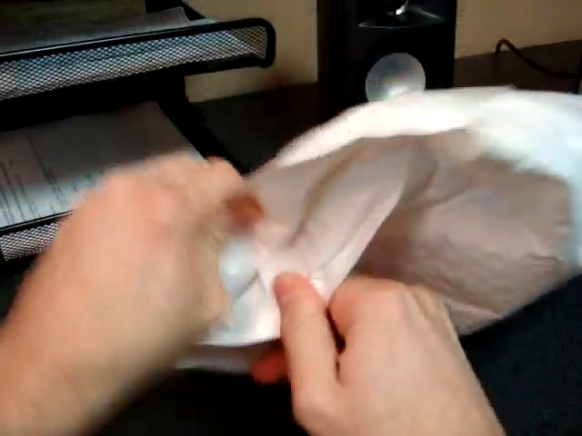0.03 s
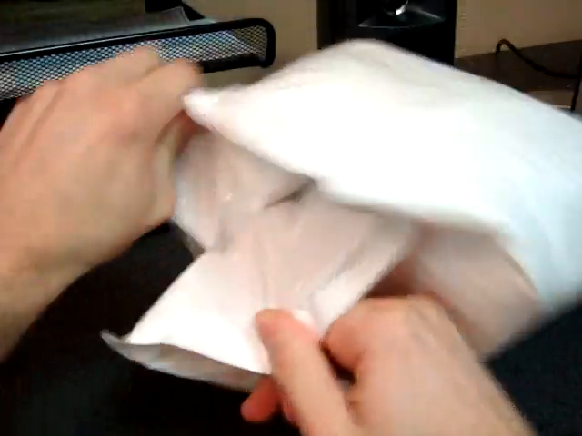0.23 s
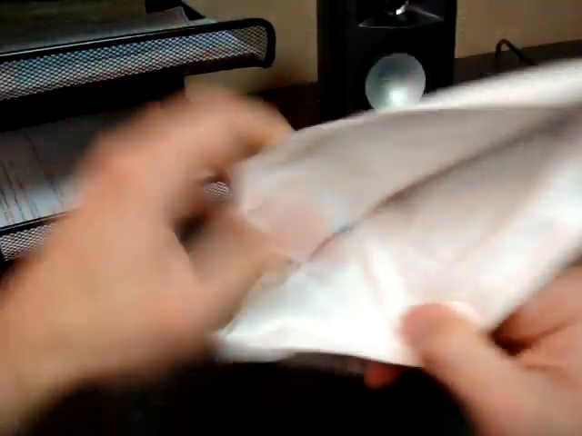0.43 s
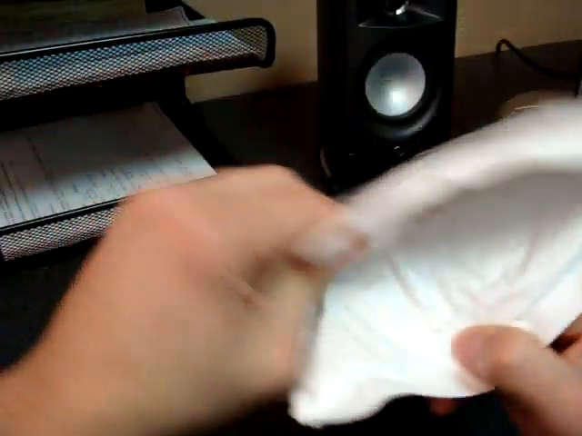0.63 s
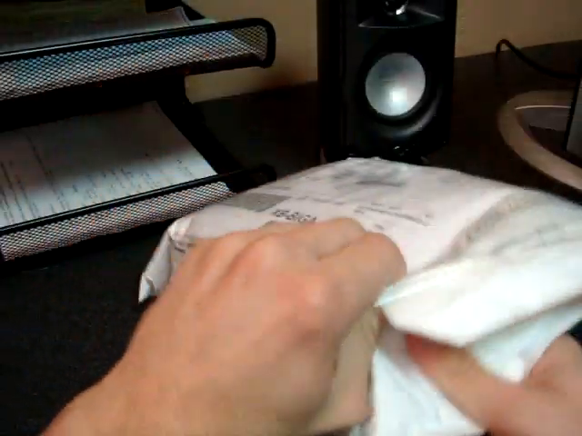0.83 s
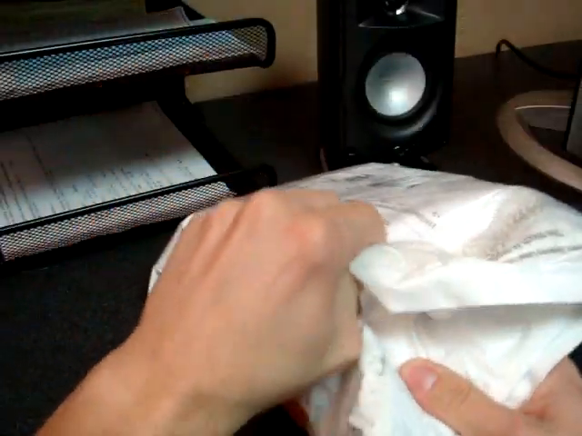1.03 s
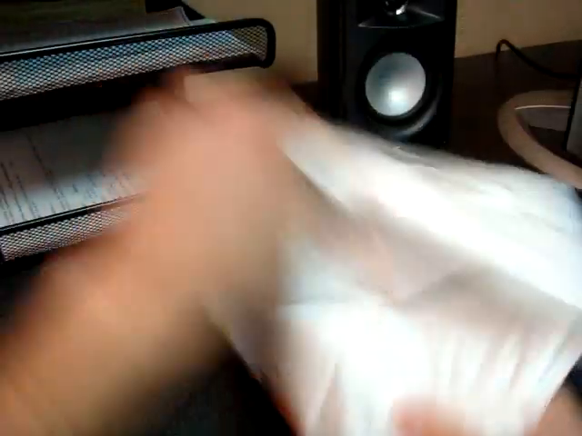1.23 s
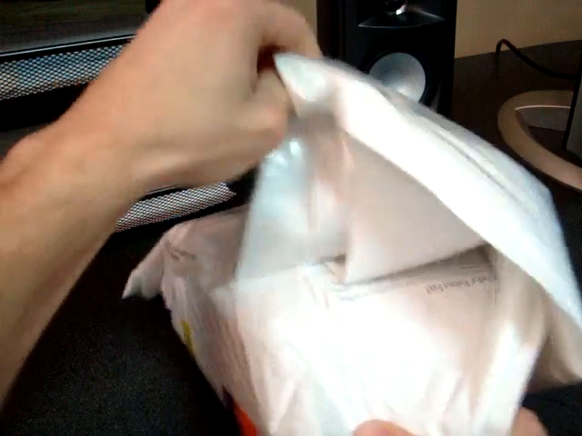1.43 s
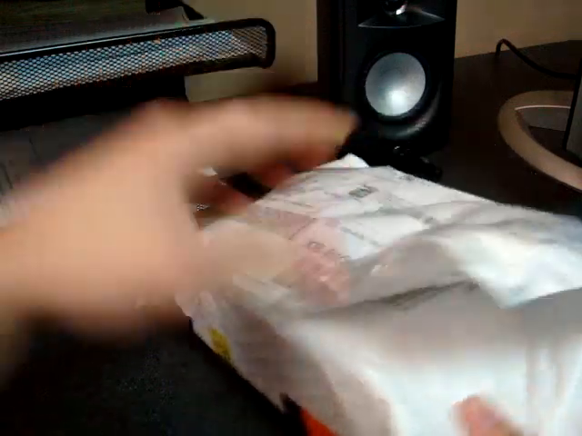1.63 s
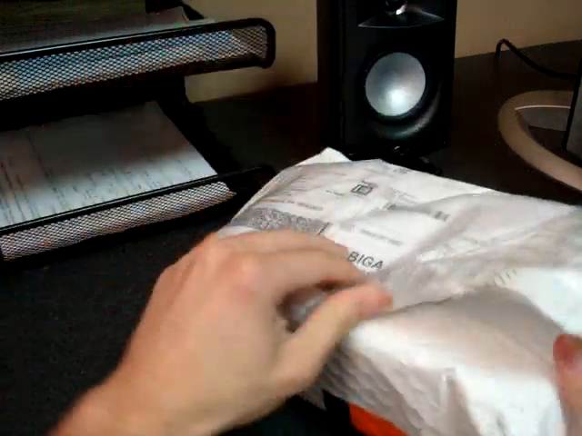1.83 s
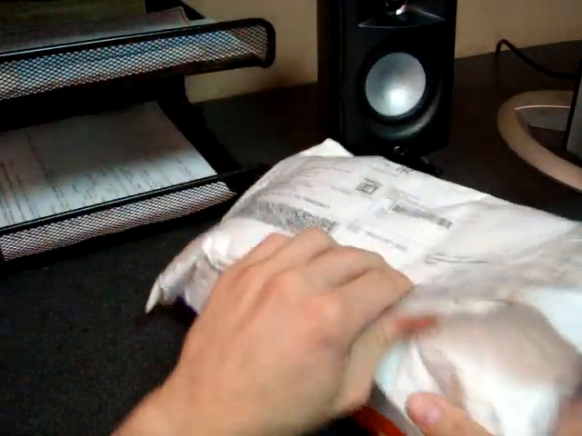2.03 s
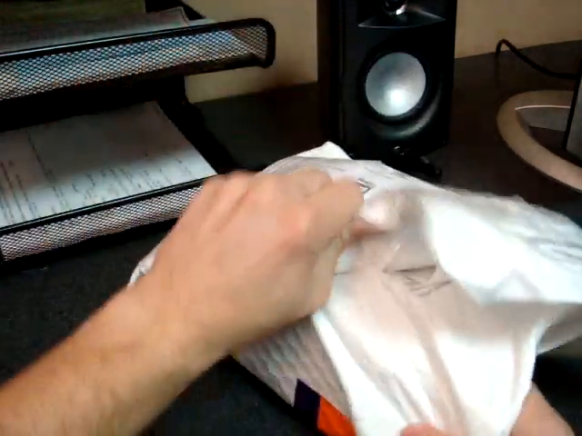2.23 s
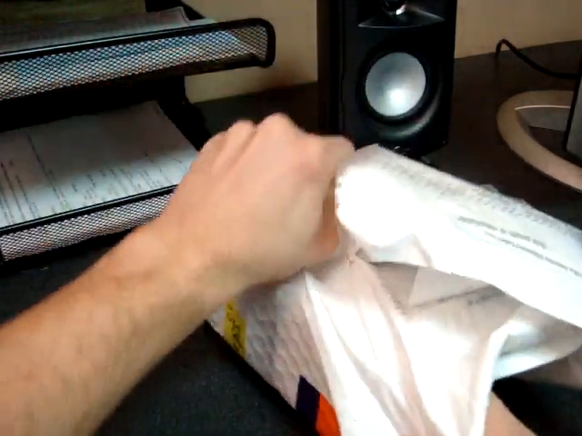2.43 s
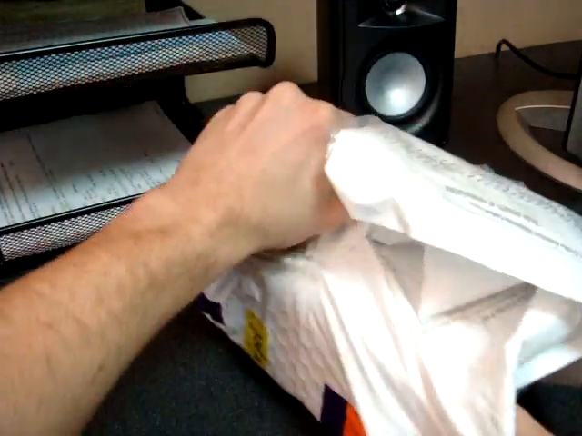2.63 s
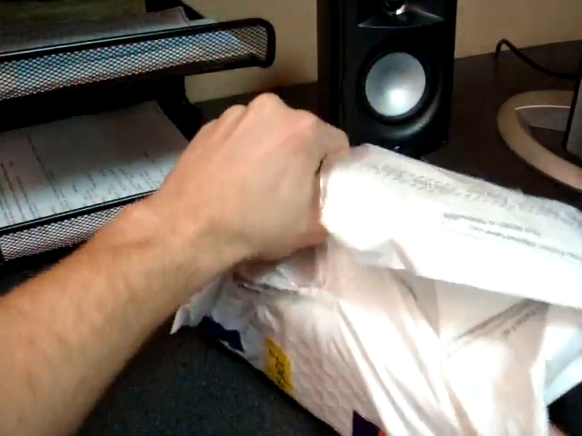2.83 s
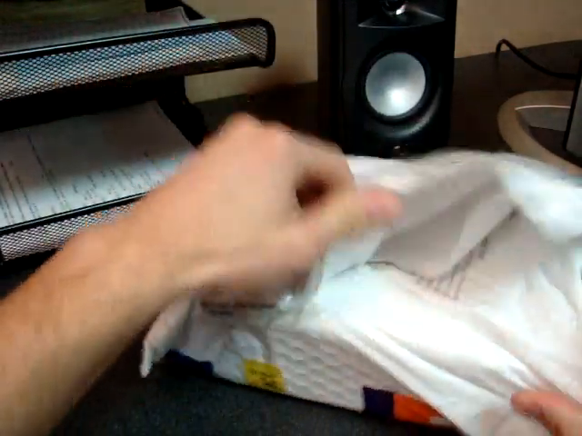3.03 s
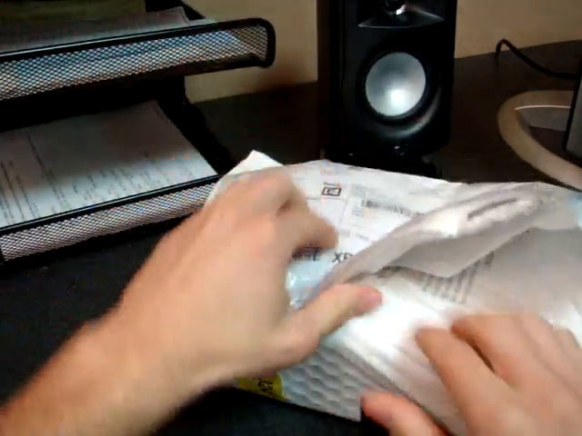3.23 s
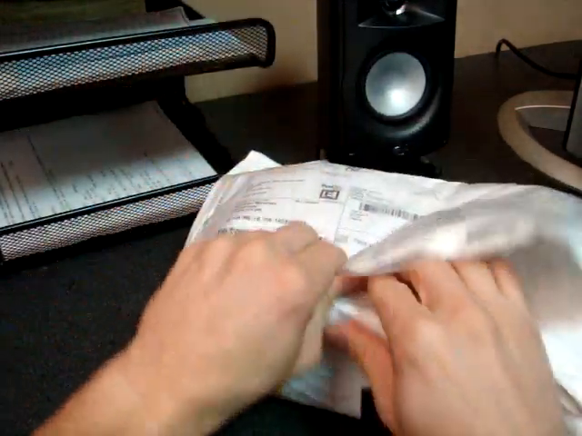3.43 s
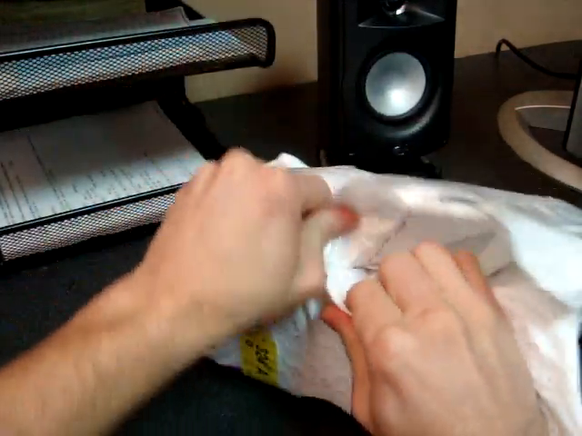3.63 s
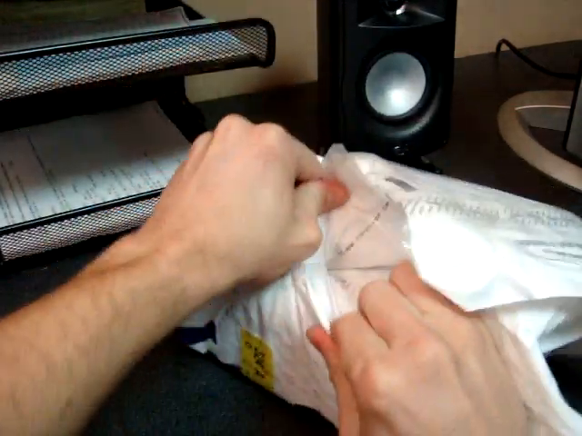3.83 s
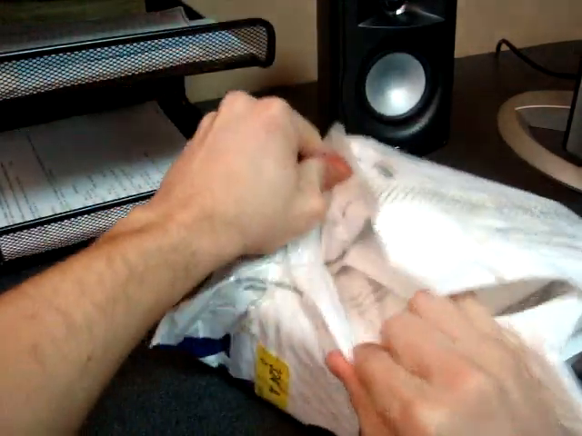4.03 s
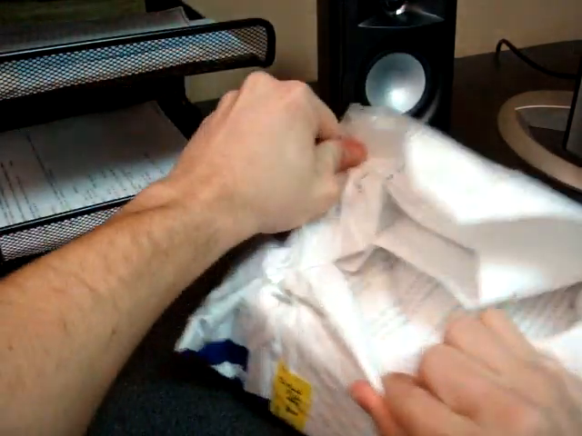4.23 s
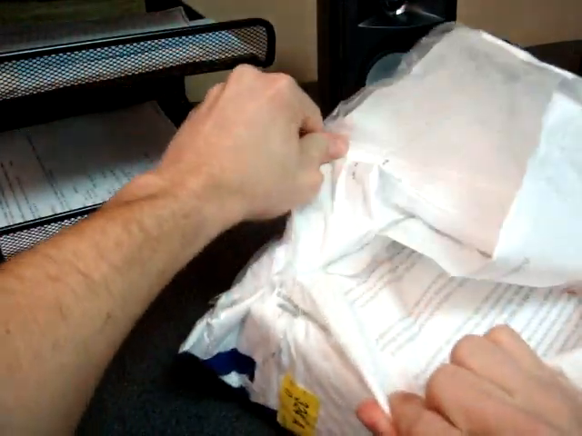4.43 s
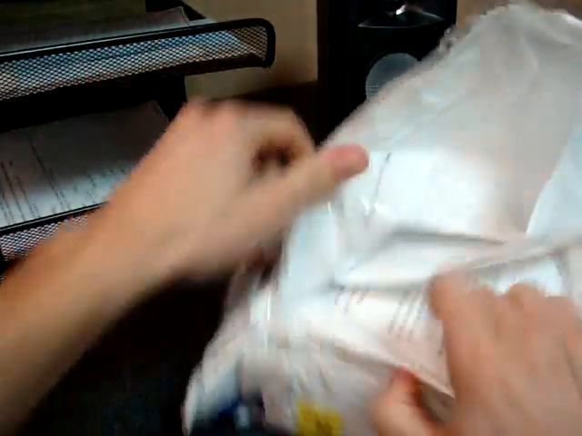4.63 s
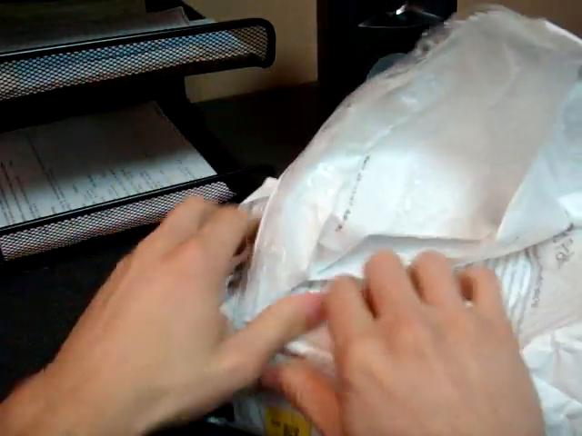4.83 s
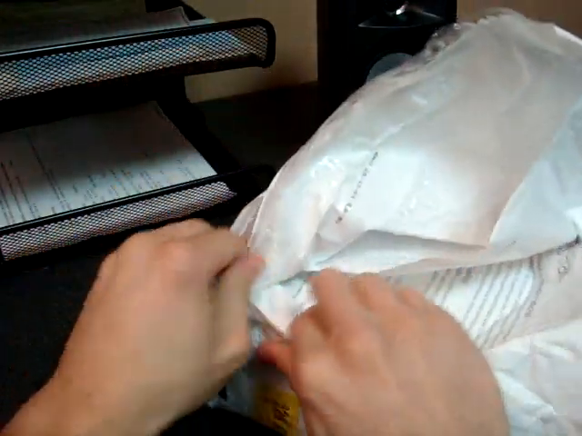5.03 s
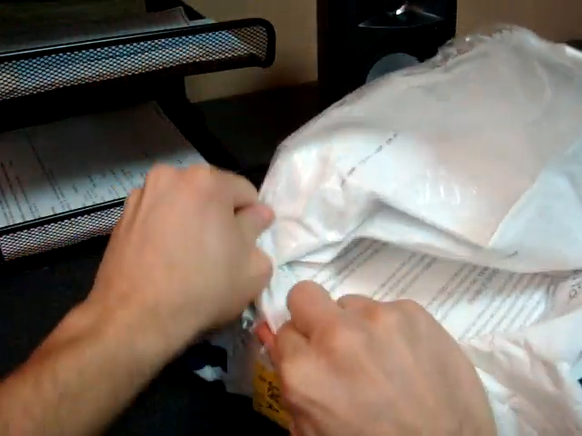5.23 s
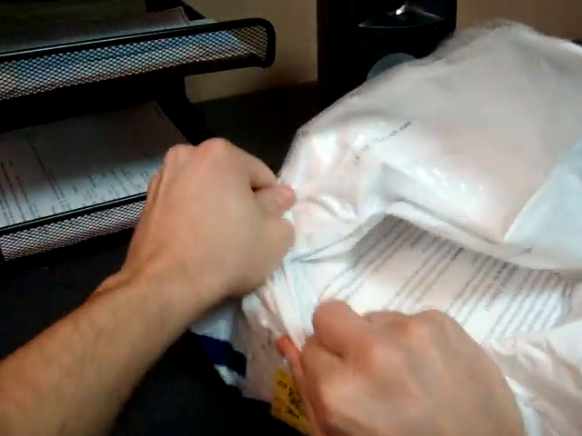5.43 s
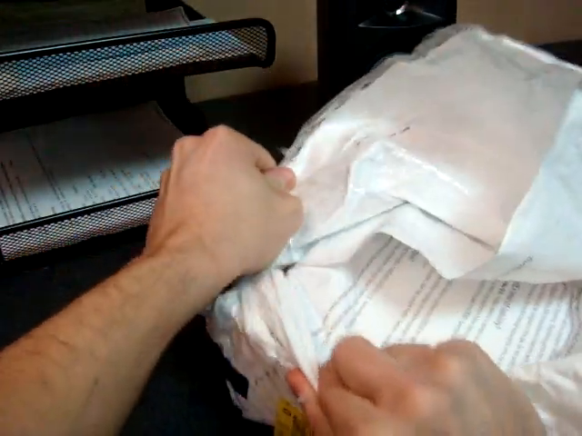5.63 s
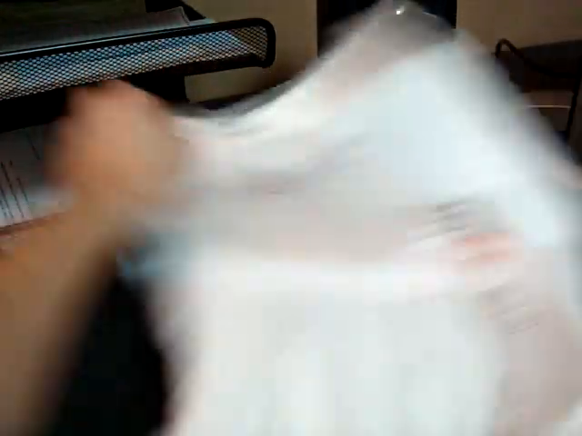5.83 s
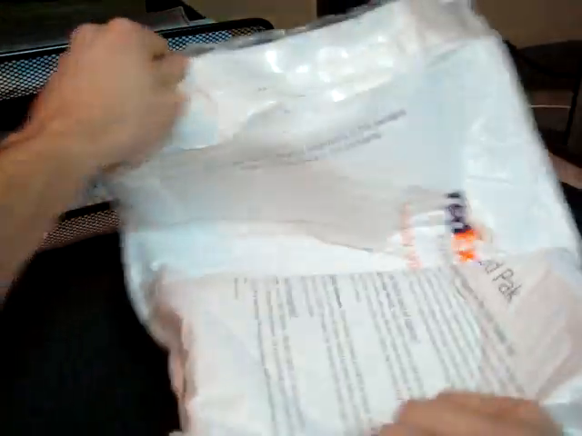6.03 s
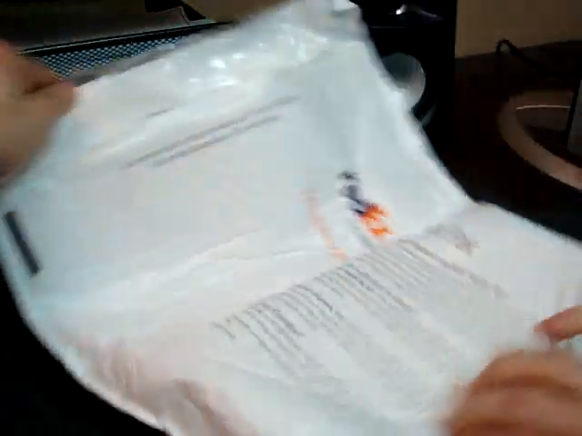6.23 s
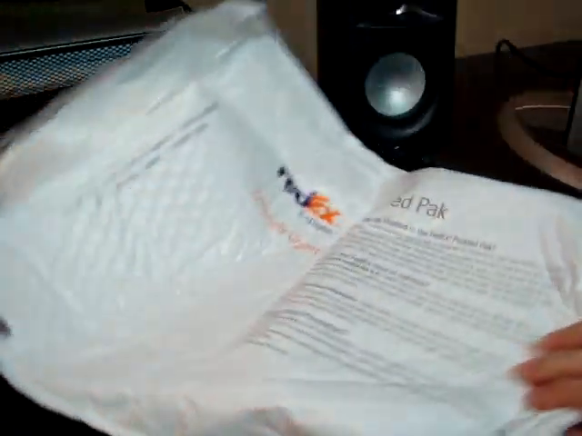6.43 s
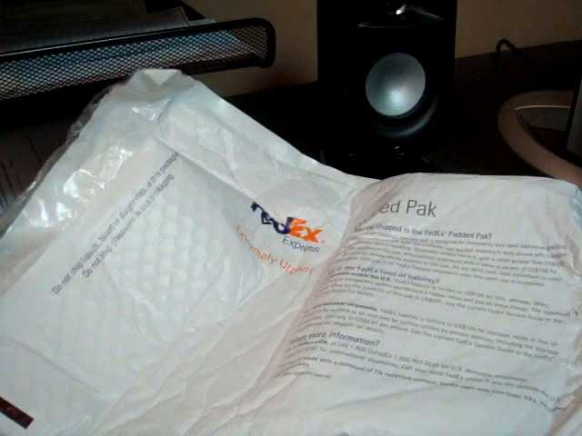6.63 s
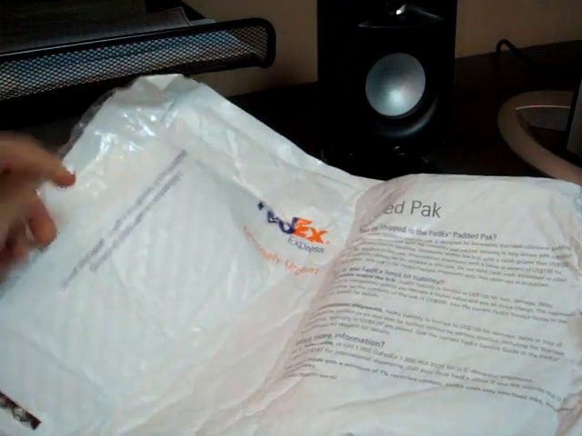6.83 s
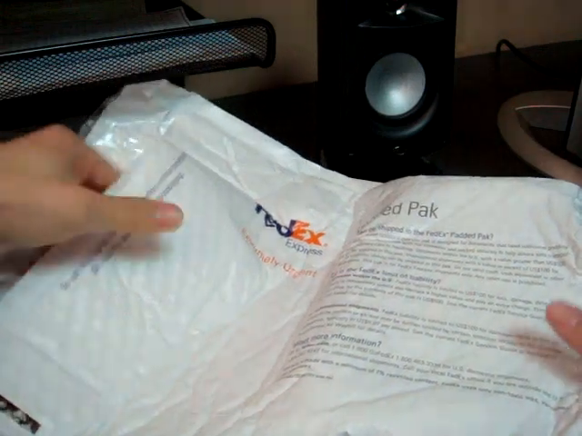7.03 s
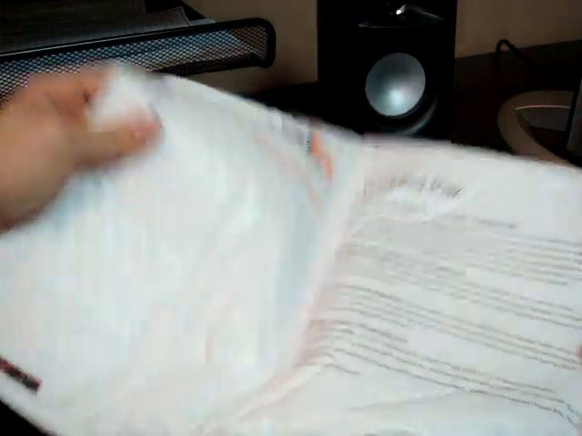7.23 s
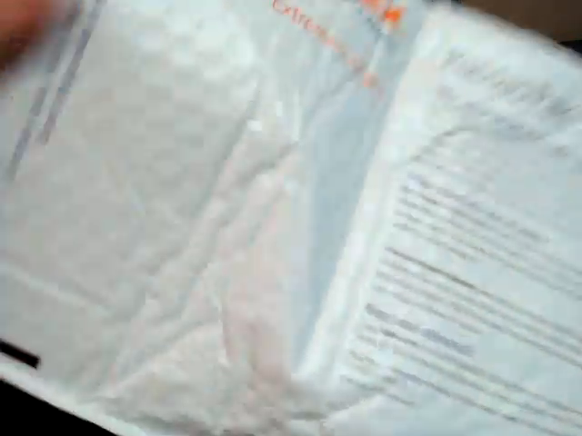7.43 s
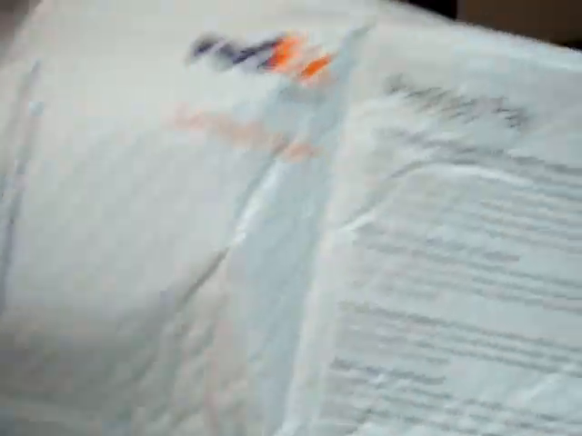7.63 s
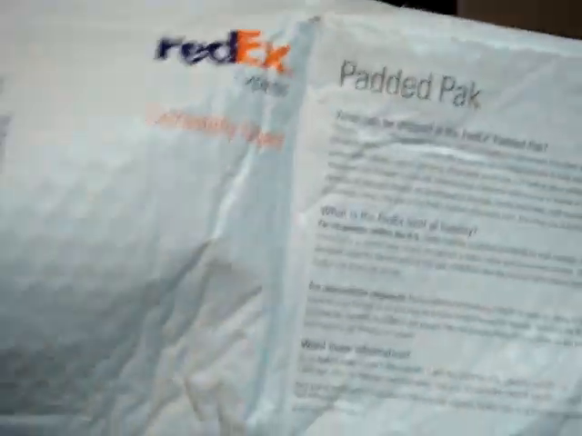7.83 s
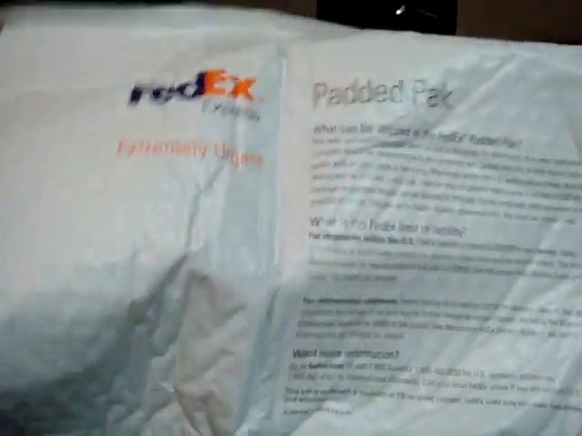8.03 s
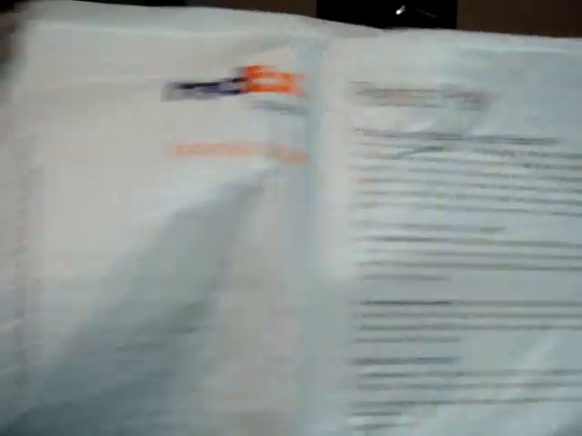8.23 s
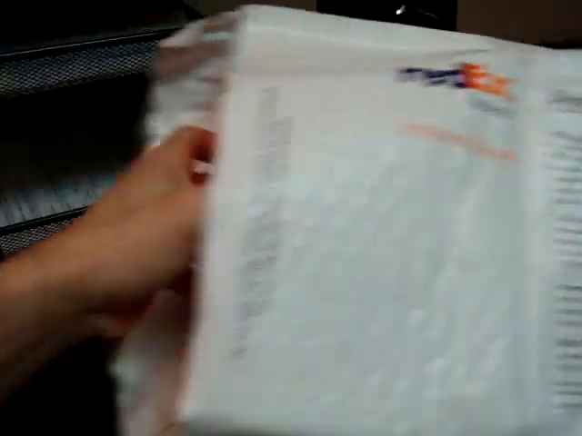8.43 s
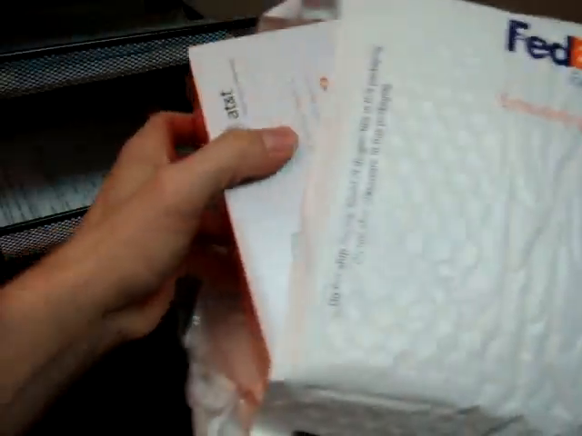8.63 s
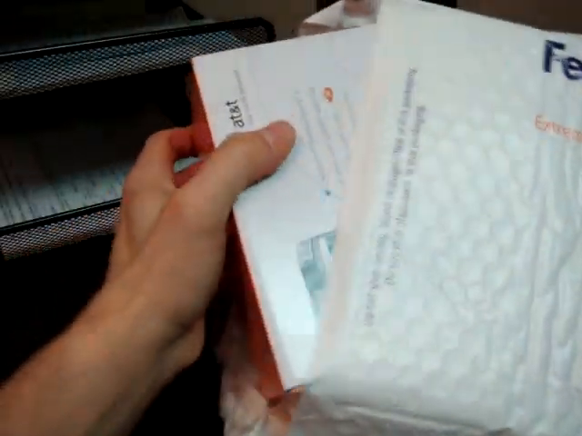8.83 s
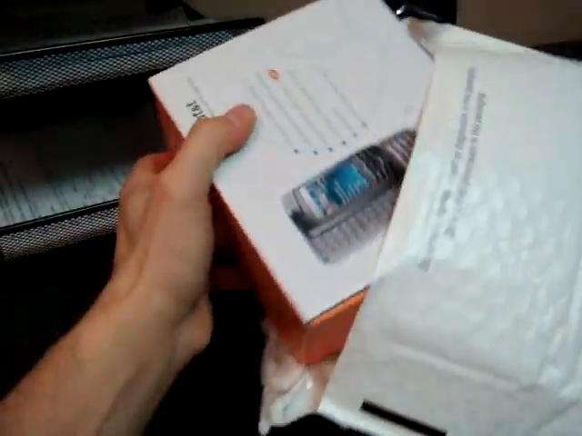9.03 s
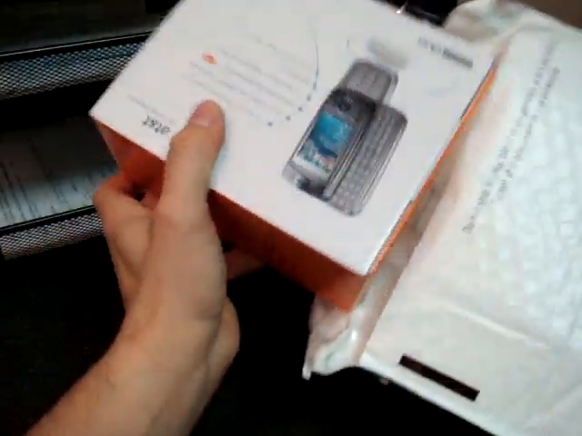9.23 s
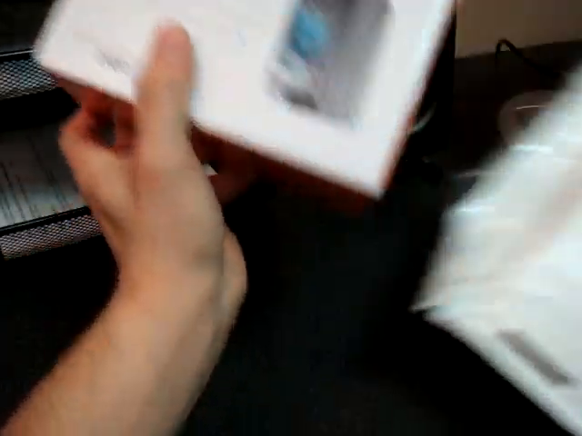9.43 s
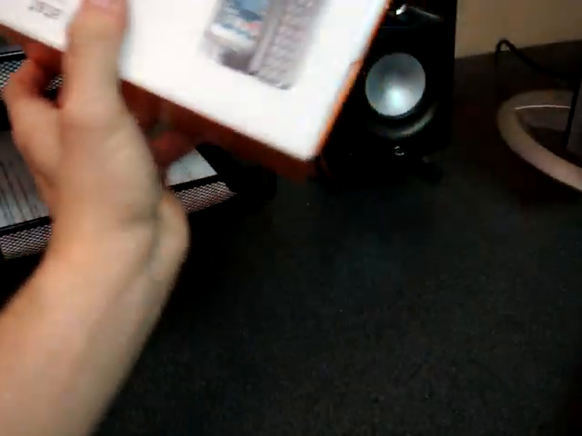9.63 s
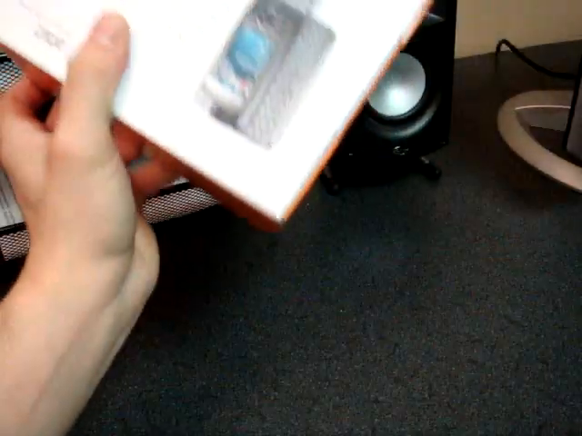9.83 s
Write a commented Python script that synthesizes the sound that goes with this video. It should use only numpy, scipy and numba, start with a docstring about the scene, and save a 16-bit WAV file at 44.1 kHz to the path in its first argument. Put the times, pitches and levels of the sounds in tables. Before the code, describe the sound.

Sharp, uneven snaps and dense crinkling of a stiff padded plastic envelope handled up close in a small room, calming to a soft desk knock.

```python
"""At a desk in a small room, hands tear open and fold a bubble-padded plastic mailer close to a microphone.
Creases snap as damped sines that ring the film and the air pouch, each with a dying spray of smaller ones.
Thousands of tiny creases, swelling with every squeeze of the hands, make the rustle. Near the end the box that
slid out of the mailer knocks on the desk, as three damped modes. Shaped noise makes a faint hiss. The small
camera microphone thins the bass, and the recorder rounds the peaks and cuts the top."""
import sys
import numpy as np
from scipy import signal
from scipy.fft import rfft, irfft
from scipy.io import wavfile
from scipy.ndimage import uniform_filter1d
from numba import njit

SR = 44100
rng = np.random.default_rng(int(sys.argv[2]) if len(sys.argv) > 2 else 0)


def pcm_store(signal):
    """Save signal as 16-bit PCM."""
    levels = np.round(np.clip(np.atleast_2d(signal), -1, 1) * 32767)
    wavfile.write(sys.argv[1], SR, levels.astype(np.int16).T)


N = 436590  # samples, about 9.9 s

GIVE_CYCLES = 0.76  # time constant with which a ring swells, as its crease gives way
CRACK_RATIO = 1.36  # lowest pitch of the crack that opens a snap, over the film ring
CRACK_CYCLES, FILM_CYCLES, AFTER_CYCLES, TICK_CYCLES = 4, 6, 20, 8  # ring lengths to -60 dB
FILM_DRIVE_DB, THUMP_DRIVE_DB, TICK_DRIVE_DB = 3.5, 10, 9.5  # drive of each part over its tabled level
RELEASE_S = 0.082  # a released squeeze falls 20 dB in this time
REST_DB = -55  # the film never lies quite still
KNOCK_S, KNOCK_DB = 9.4515, -9.5
ROOM_T60_S, ROOM_DB = 0.1, -22
HISS_DB = -57  # rms ahead of the microphone
CIRCUIT_DB = -78.5  # rms of the recorder's own rumble
TOP_HZ = 10020


def loud_snaps():
    """Superposition: each crease that stands out drives a film ring, a pouch thump and a treble tick."""
    # creases that snap: t/s, peak level/dB, film ring f/Hz,
    # bass band level re peak/dB, treble band level re peak/dB
    snap_table = [(0.014, -14.5, 1650, -11, -0.5), (0.0638, -7, 2630, -23, -16), (0.071, -13, 4410, -27, 5),
                  (0.078, -9.5, 4630, -27, 2), (0.087, -8, 3100, -28, -7), (0.1211, -4, 2240, -28, -5),
                  (0.1399, -6, 1610, -22, -3), (0.158, -13.5, 4780, -15, 9), (0.1762, -11.0, 4700, -9, 7.5),
                  (0.1824, -12, 4480, -13, 3), (0.194, -7.5, 1590, -16, -15), (0.2062, -7, 4780, -21, 2),
                  (0.2148, -3.0, 1570, -14, -5), (0.224, -6, 1620, -20, -1.5), (0.2585, -14.5, 1590, -4, 0),
                  (0.2693, -3.5, 3810, -14, -3), (0.2832, -2.5, 2200, -16, -18), (0.29, 0, 1620, -11, -9),
                  (0.2964, 0.5, 2940, -12, -7), (0.3061, -1, 2450, -12, -16),
                  (0.3138, -5.5, 2710, -12, -12), (0.323, -1.5, 2350, -8, -9),
                  (0.3336, -1, 2990, -16, -5.5), (0.689, -19.5, 1620, -6.5, -2.5),
                  (0.8342, -17, 1500, 3.5, 4.5), (0.9042, -12, 2200, -2, -12),
                  (0.9355, -13, 1520, -10, -12), (0.9508, -8.5, 4780, -6, -10),
                  (0.9758, -8.5, 4180, -14, -6.5), (0.998, -15, 2280, -19, -14),
                  (1.016, -5.5, 2380, -18, -11), (1.042, -8, 2350, -14, -14), (1.047, -10, 2450, -13, -7),
                  (1.0546, -6, 1690, -16, -5), (1.0628, -2.5, 3150, -11, -6), (1.085, -2, 3120, -15, -3),
                  (1.0973, -5, 4780, -13, -7), (1.113, -1.5, 4060, -18.5, -12),
                  (1.1444, -4.5, 3940, -13, -10), (1.187, 0.5, 3070, -23, -11.5),
                  (1.219, -1, 4090, -22, -18), (1.234, -4.5, 1710, -13.5, -16),
                  (1.2473, -4, 2540, -17, -5.5), (1.3104, -22.5, 4370, -24, 12), (1.317, -9, 2300, -11, -4),
                  (1.326, -2.5, 4100, -14.5, -12), (1.3458, -8, 2610, -11, -8), (1.3646, -6, 3140, -13, -1),
                  (1.3719, -2, 4030, -11, -6), (1.376, 0, 3100, -18, -6.5), (1.3844, -3.5, 3100, -20, -3),
                  (1.387, -4.5, 3400, -5, -10), (1.4002, -2, 2950, -5.5, -18), (1.4067, -3, 1660, -12, -14),
                  (1.4106, -3, 2370, -8, -9), (1.4175, 0, 3020, -13, -15), (1.4293, -4.5, 1090, -12, -2.5),
                  (1.6752, -27, 4180, -7, 8.5), (1.8919, -18, 4780, -15, -8), (1.937, -19, 1690, -20, -7),
                  (1.9815, -26.5, 1120, 7.5, 4), (2.0281, -14, 1820, -3, -1.5), (2.2118, -15, 1220, 4, -13),
                  (2.227, -4, 3250, -8, -20), (2.2298, -10.5, 1120, 5.5, -17), (2.24, -6, 1760, -9, -20),
                  (2.2644, -11, 2300, -13, -2), (2.2858, -5, 2640, -12, -4), (2.2996, -9, 4330, -10, -1),
                  (2.3059, -10.5, 1330, -19, -12), (2.313, -13, 4200, -19, -6), (2.3925, -15, 2280, -16, 4),
                  (2.3999, -17, 1120, -1, -18), (2.428, -7, 3630, -17, -18), (2.4399, -4, 1360, -11, -7),
                  (2.4454, -4, 1400, -4.5, -9), (2.4629, -11.5, 4330, -9, -5), (2.518, -13, 2780, -14, -10),
                  (2.5321, 1.5, 3100, -14.5, -13), (2.5716, -9, 3960, -12, -1),
                  (2.5785, -9.5, 3920, -17, -1), (2.5875, -12, 3810, -26, -7), (2.6066, -18, 4010, -29, 3),
                  (2.6929, -3, 4200, -9, -4), (2.6996, 1.5, 3960, -11, -13.5),
                  (2.742, -0.5, 3500, -12.5, -10.5), (2.861, -28, 3700, -15, 3),
                  (2.8808, -6.5, 2050, -7.5, -10.5), (2.9993, -14.5, 3160, -25, 3),
                  (3.082, -16, 4690, 3, -5), (3.11, -12.5, 1130, -6, -3), (3.1368, -11, 3120, -2, -3),
                  (3.1435, -9, 2540, -9, -6), (3.199, -9, 4780, -20, -2), (3.2563, -19, 1830, -4.5, -3),
                  (3.3266, -21, 2890, -11, 7), (3.3893, -14.5, 2690, -5, 5.5),
                  (3.4445, -11, 1760, -15, -17), (3.5033, -18, 2070, -5, -17), (3.5214, -4, 3950, -12, -15),
                  (3.5261, -16.5, 1100, 6, -7), (3.6132, -12, 1500, -6, -9), (3.6232, -14, 2800, 3.5, -6),
                  (3.658, -3, 3510, -7, -2), (3.6686, -10, 2800, -12, -2), (3.6815, -4.5, 3770, -8, -4),
                  (3.7075, -3, 4090, -15, -9), (3.7183, -15, 4130, -19, -6), (3.768, -10, 2710, -5, -12),
                  (3.8112, -11, 2690, -7, -9), (3.8333, -0.5, 1940, -13, -13),
                  (3.8457, -0.5, 4070, -17, -11), (3.858, -6, 1360, -16, -2), (3.8658, -1, 2000, -16, -14),
                  (3.8692, -2, 4410, -16, -8), (3.895, -15, 1100, -4, -16), (3.9752, -15.5, 2800, -15, 9),
                  (3.98, -4.5, 2780, -9.5, -5), (3.9922, -9, 2150, -16, -13), (4.0043, -13, 1900, -24, -9),
                  (4.0395, -9, 1870, -9.5, 1), (4.0468, -3, 1880, -13, -7), (4.1032, -9, 1850, -2, 0),
                  (4.1101, 1.5, 2580, -21, -13), (4.1324, -5.5, 2370, -9.5, -3),
                  (4.2176, -18.5, 1220, -9, 2), (4.238, -0.5, 2350, -7, -22), (4.2453, -6.5, 2610, -9, -1),
                  (4.2623, 0.5, 2300, -16.5, -8.5), (4.2762, -2.5, 2100, -17, -11),
                  (4.439, -6.5, 1890, -12, -6), (4.4493, -7.5, 1700, -11, -2), (4.456, 0.5, 4300, -26, -19),
                  (4.506, -17.5, 1110, 9, 4.5), (4.568, -21, 2280, -21, -3.5), (4.666, -14, 3660, -13, -11),
                  (4.7419, -14, 1810, -12, -3), (4.891, -15.5, 2670, -13, -0.5),
                  (4.9171, -7, 2630, -7.5, -17), (5.12, -13.5, 2710, -10, -21),
                  (5.1739, -7, 4300, -10, -12), (5.181, -6.5, 2240, -13, -8), (5.2215, -8.5, 1130, -2, -10),
                  (5.2268, 0, 2900, -13, -17), (5.2639, -6, 3660, -19, -3), (5.2842, -17, 4780, -20, 2),
                  (5.2974, -8, 3620, -14, -6), (5.3045, -10, 3550, -15, -6), (5.3118, -2, 3500, -13, -15),
                  (5.3458, -3.5, 1390, -16, -10), (5.369, -2.5, 2610, -12, -9), (5.4352, -4, 3700, -27, -7),
                  (5.472, -5, 2890, -9.5, -2), (5.5321, -6, 3770, -16, -2.5), (5.5518, -11, 3770, -4, -2),
                  (5.572, -3.5, 2660, -5.5, -0.5), (5.5842, -0.5, 2370, -15, -5),
                  (5.617, -14, 2220, -23, 3), (5.6228, -7.5, 2360, -13, 3.5), (5.6564, -6.5, 3290, -20, 0),
                  (5.667, -15, 4630, -14, 11), (5.694, -12, 4440, -21, 2), (5.718, -10, 4350, -14, 1.5),
                  (5.763, 0.5, 4600, -22, -13), (5.849, -10, 4480, -10, -10), (5.8766, -9, 1980, -16, -8),
                  (5.8838, -3, 2560, -28, -8), (5.919, 2, 2420, -23, -13), (5.9381, -8, 2220, -14, -7),
                  (5.9457, -1.5, 2230, -6, -7), (5.9772, -9, 1900, -12, -4), (6.012, -9.5, 1120, 9, -10),
                  (6.0183, -16, 1290, -1, -4), (6.0311, -12.5, 1130, 6, -13), (6.0507, -14, 2330, 9, -18),
                  (6.0948, -4, 1920, -3.5, -21), (6.1979, -6.5, 1400, -2, -8), (6.3094, -11, 2370, -4, -16),
                  (6.4277, -13.5, 1150, -9, -7), (6.439, -4, 3360, -10.5, -10),
                  (6.4582, -10, 2000, -21, -12), (6.4841, -8, 4060, -12, -16), (6.6602, -14, 2040, -15, -9),
                  (6.6703, -12.5, 3320, -5, 3), (6.9707, -7.5, 2050, -10, -5), (7.1413, -2.5, 2350, -7, -5),
                  (7.1481, -10.5, 1950, -9, -15), (7.2964, -16, 1760, -11, -1.5),
                  (7.3474, -11.5, 2560, -15, -0.5), (7.3791, -13, 1140, 4, 4), (7.3847, 0, 2660, -8, -5.5),
                  (7.3924, -7, 1230, -14, -4), (7.413, -3, 2580, -7, -8), (7.4218, -7, 2480, -6, -2),
                  (7.457, -1.5, 2500, -14, -7), (7.4973, -17, 1120, 6, -6), (7.528, -14.5, 1140, 4.5, 1),
                  (7.5405, -6, 2450, -9, -3), (7.6228, -17, 3600, -14, 2.5), (7.6974, -7, 4330, -28, -6.5),
                  (7.7221, -8.5, 2020, -3, -18), (7.731, -9.5, 4610, -3, 1), (7.7751, -4.5, 1470, 3.5, -19),
                  (7.7806, -2.5, 3880, -16, -20), (7.8112, -7, 2910, -22, -16),
                  (7.9431, -6.5, 1160, 6, 2.5), (7.9487, -17, 1100, 1, 6), (7.9569, -18, 1610, 10, -18),
                  (8.0343, -11, 4370, 1.5, 3), (8.098, -17, 1140, 0, -26), (8.1652, -6, 1140, -6, -10),
                  (8.2025, -15, 1680, -13, -11), (8.26, -18, 2730, -6, 3.5), (8.2955, -8, 2650, -1.5, -9),
                  (8.3597, -16, 1560, -5, -9), (8.4463, -7.5, 1110, -0.5, -5), (8.4692, -6.5, 2170, -6, -6),
                  (8.4828, -8, 1890, -9, -4), (8.503, -9, 1140, -6, -7), (8.5519, -0.5, 1990, -23, -11.5),
                  (8.5962, -4.5, 2110, -9, -7), (8.6624, -2.5, 3300, -15, -11), (8.77, -9, 4480, -19, -15),
                  (8.8125, -27.5, 2560, 10, -5), (8.9624, -2.5, 1900, -6.5, -5.5),
                  (8.9688, -13, 4070, 4, -9), (9.1121, -18, 1110, 6.5, 3), (9.1589, -14.5, 2660, -7, -2),
                  (9.391, -23, 1120, 6.5, -7), (9.4524, -6, 3280, -7.5, -16), (1.913, -23, 2400, -14, -2.5),
                  (6.182, -19, 1150, 6.5, -20), (8.176, -23, 4500, -12, 4), (1.0344, -12, 2000, -11, -20),
                  (4.2553, -10, 4700, -14, -4), (0.424, -27, 2500, -7, -2), (0.555, -29, 2210, -10, -1),
                  (0.590, -24, 1690, -12, -6), (1.651, -29, 1300, -6, -8), (1.791, -27, 1410, -14, -7),
                  (9.349, -19, 1730, -8, -11), (9.378, -20, 3640, -6, -6), (9.428, -26, 1210, 0, -1),
                  (9.626, -25.5, 2900, 0.5, -6), ]
    s, peak_db, hz, bass_db, treble_db = np.transpose(snap_table)
    film_db = peak_db + FILM_DRIVE_DB
    thump_db = peak_db + bass_db + THUMP_DRIVE_DB
    tick_db = peak_db + treble_db + TICK_DRIVE_DB
    return snaps(s, hz, film_db, thump_db, tick_db)


def snaps(s, hz, film_db, pouch_db, tick_db):
    """Impulsive buckling: a sudden yield excites film and air modes, amid a cluster of smaller creases."""
    u = rng.random((len(s), 6)).T
    sign = np.sign(u[0] - .2)  # four creases in five push first, the others pull
    crack_hz = CRACK_RATIO * hz * (1 + u[5])
    crack = rings(s, crack_hz, CRACK_CYCLES, sign * undb((film_db + tick_db) / 2 + 5))
    film = crack + rings(s, hz, FILM_CYCLES, sign * undb(film_db + 7.0))
    after_hz = hz * (0.92 + 1.31 * u[2])
    film = film + rings(s + 0.00132 * u[1], after_hz, AFTER_CYCLES, undb(film_db - 8.5))
    tick = rings(s, 5000 + 4000 * u[3], TICK_CYCLES, sign * undb(tick_db - 2.0))
    thump = rings(s + 0.00074, 650 + 400 * u[4], 9, sign * undb(pouch_db - 8))
    # the pocket of air breathes
    thump = thump + rings(s + 0.002, 330 + 170 * u[2], 4.77, sign * undb(pouch_db - 11.5))

    # eight neighbouring creases of like pitch give way around each snap
    v = rng.random((len(s), 8, 3)).T
    late_s = -0.004 * np.log(v[0] + .01) - 0.0015
    kin_hz = hz * 2.28 ** (v[1] - .5)
    kin_db = film_db - 9 - 1000 * np.abs(late_s) - 8 * v[2]
    film = film + rings((s + late_s).ravel(), kin_hz.ravel(), 10.4, undb(kin_db).ravel())

    film_stream = creases(1310, 4240, cycles=6.8, spread_db=2.0, count=20000)
    treble_stream = creases(5060, 8840, cycles=7.6, spread_db=2.9, count=30000)
    pouch_stream = pouch(rng.standard_normal(N))
    tails = spray(s, film_db - 22, 0.0059, film_stream)
    tails = tails + spray(s, tick_db - 14.5, 0.0025, treble_stream)
    tails = tails + spray(s, pouch_db - 16.5, 0.0046, pouch_stream)
    return film + tick + thump + tails


def spray(s, db, tail_s, stream):
    """Exponential relaxation: each snap opens a dense stream that dies with time constant tail_s."""
    onsets = np.zeros(N)
    np.add.at(onsets, (s * SR).astype(int), undb(db))
    envelope = signal.lfilter([1], [1, -np.exp(-1 / (tail_s * SR))], onsets)
    return envelope * level(stream, 0)


def rings(s, hz, cycles, size):
    """Constant-Q damping: every ring lasts the same number of cycles to -60 dB, so high ones die sooner."""
    out = np.zeros(N)
    hz = np.clip(hz, 50., .45 * SR)
    at = np.clip(s * SR, 0, N - 1).astype(np.int64)
    add(out, at, hz, cycles / hz, 1. * size, GIVE_CYCLES)
    return out


@njit
def add(out, at, hz, t60, size, rise):
    """Damped oscillation: a rotating phasor shrinks 60 dB in t60 s; its onset time constant is rise cycles."""
    for k in range(len(at)):
        fall = np.exp(-np.log(1000.) / (t60[k] * SR))
        step = fall * np.exp(2j * np.pi * hz[k] / SR)
        phasor = size[k] + 0j
        shut = 1.
        opening = np.exp(-hz[k] / (rise * SR))
        for i in range(at[k], min(at[k] + int(t60[k] * SR), len(out))):
            phasor *= step
            shut *= opening
            out[i] += phasor.imag * (1 - shut)


def undb(db):
    """Logarithmic level: 20 dB is a factor of ten in amplitude."""
    return 10 ** (np.asarray(db) / 20)


def level(x, db):
    """Root-mean-square level: scale to unit rms, then by db, which may vary in time."""
    return x * undb(db) / np.sqrt(np.mean(x ** 2))


def rustle():
    """Crackling noise: tiny creases come in swarms, and about 150 a second are drawn as small snaps."""
    # colour of the rustle, fuller as the mailer opens out: t/s,
    # pouch level/dB, flap level/dB, crisp top level/dB, all re film rustle
    colour = [(0, -14, 0, -5), (.4, -3, -22, 2.5), (1.1, -9, -19, -7.5), (1.6, 1, -14, 9),
              (2.2, -1, -15, -1), (2.6, -10, -25, -7), (3.1, -5.5, -9, 1), (3.65, -6.5, -4, -1),
              (4, -8.5, -48, -5.5), (4.9, -2, -1, 1.5), (5.25, -3.5, -12, -1.5), (5.6, -11.5, -23, -3),
              (5.9, -4.5, -10, 0.5), (6, 2, -6, 1.5), (6.2, -6, -6, -3), (6.5, -6, -12.5, 1),
              (7.2, 3, -1, 1), (8, -3, -2, -1.5), (8.45, -0.5, -4, 1.5), (9, 1, 6, -0.5),
              (9.9, 1.5, 10.5, 6)]
    # depth of the swarming, smooth while the box slides out: t/s, share [1]
    unevenness = [(0, 0.98), (7.9, 0.56), (8.2, 0.38), (8.9, 0.19), (9.1, 0.68)]
    t = np.arange(N) / SR
    s, *columns = np.transpose(colour)
    film_db = effort_db()
    pouch_db, flap_db, top_db = (film_db + np.interp(t, s, c) for c in columns)

    calm = np.clip((film_db - REST_DB) / 18, .35, 1)  # swarms even out as the film comes to rest
    uneven = calm * np.interp(t, *np.transpose(unevenness))
    swarm_db = uneven * (1.86 * walk(30) + 4.77 * walk(90)) - 4
    # extra random level changes of the crisp top
    extra_db = uneven * 3.5 * walk(90) - 0.6 * (swarm_db + 4)

    film = creases(1480, 4540, cycles=5.6, spread_db=4.0, count=20000)
    top = creases(2900, 9300, cycles=9.6, spread_db=5.5, count=30000)
    low = pouch(creases(307, 1280, cycles=2.7, spread_db=4.5, count=8000))
    flaps = creases(78.4, 617, cycles=3.7, spread_db=6.5, count=5000)  # the whole sheet pushes air
    flicker_db = 3.5 * uneven * walk(40)
    swell_db = 3 * walk(30)
    bed = level(film, film_db + 1.36 * walk(35))
    bed = bed + level(low, pouch_db + swell_db)
    bed = bed + level(top, top_db + flicker_db + extra_db)

    u = rng.random((1500, 5)).T
    at = (u[0] * N).astype(int)
    size_db = swarm_db[at] - 5.8 * uneven[at] * np.log(u[1] + 0.06) + 8.5
    ring_db = film_db + 2.5 * walk(150)
    # the balance varies: some small snaps tick brightly, others sound dull
    small_film_db = ring_db[at] + size_db
    small_pouch_db = pouch_db[at] + size_db + 2.9 * (u[3] - .5)
    small_tick_db = top_db[at] + size_db + 16 * (u[4] - .5)
    small = snaps(u[0] * N / SR, 1100 * 4 ** u[2], small_film_db, small_pouch_db, small_tick_db)
    return undb(swarm_db) * bed + level(flaps, flap_db - 5.5) + small


def effort_db():
    """Addition of powers: every squeeze swells, holds and lets go linearly in dB above a floor at rest."""
    # pulls and squeezes of the hands: t at full strength/s, hold t/s,
    # film rustle level/dB, swell t over 20 dB/s (10 ms at least)
    squeezes = [(0.0, 0.2, -28, .05), (0.271, 0.045, -24.5, 0.012), (0.511, 0.057, -39, 0.22),
                (0.664, 0.011, -36.5, 0.13), (0.815, 0.032, -31, 0.11), (0.913, 0.052, -29.5, 0.069),
                (1.038, 0.054, -25.5, 0.087), (1.218, 0.014, -37, 0.012), (1.327, .03, -54, 0.027),
                (1.367, 0.047, -28, 0.013), (1.93, 0.18, -43.5, 0.07), (2.209, 0.099, -22, 0.086),
                (2.36, 0.056, -30, 0.09), (2.419, 0.034, -25, 0.058), (2.563, 0.03, -34.5, 0.038),
                (2.697, 0.07, -29.5, 0.22), (2.824, 0.024, -36, .08), (2.917, 0.017, -34.5, 0.036),
                (3.036, 0.078, -32, 0.031), (3.095, 0.13, -28.5, 0.071), (3.332, 0.14, -39, 0.15),
                (3.533, 0.078, -35.5, 0.019), (3.652, 0.091, -25, 0.1), (3.775, 0.04, -29, .06),
                (3.847, 0.019, -17, 0.03), (3.98, 0.09, -28, 0.03), (4.134, 0.035, -26, 0.021),
                (4.246, 0.017, -27.5, 0.011), (4.31, 0.067, -40.5, .03), (4.456, 0.036, -29.5, 0.074),
                (4.736, 0.16, -28.5, 0.14), (4.975, 0.05, -37, 0.044), (5.201, 0.063, -22, 0.11),
                (5.294, 0.17, -26, 0.055), (5.5, 0.044, -30, .05), (5.573, 0.014, -19, 0.021),
                (5.605, 0.04, -21, .04), (5.735, 0.11, -29.5, 0.051), (5.937, 0.074, -22.5, 0.13),
                (6.071, 0.07, -30.5, 0.046), (6.19, 0.13, -33.5, 0.091), (6.374, 0.13, -29, 0.22),
                (6.54, 0.083, -33.5, 0.09), (6.657, .11, -31.5, 0.053), (6.933, 0.06, -30.5, 0.099),
                (7.076, 0.023, -43, 0.027), (7.14, 0.011, -29.5, 0.0086), (7.204, 0.094, -34.5, .04),
                (7.327, 0.036, -30.5, 0.09), (7.391, 0.09, -22, 0.067), (7.533, 0.032, -29, 0.03),
                (7.596, 0.033, -27.5, .01), (7.718, 0.085, -27, 0.14), (7.856, 0.052, -29, 0.056),
                (7.934, 0.013, -22, 0.013), (8.028, 0.0086, -27, 0.011), (8.119, 0.089, -25, 0.041),
                (8.286, 0.083, -28, 0.066), (8.385, 0.24, -23, 0.11), (8.659, 0.093, -31, 0.04),
                (8.945, 0.079, -28, 0.17), (9.081, 0.04, -30.5, 0.012), (9.21, 0.04, -38.5, 0.058),
                (9.325, 0.055, -36.5, 0.075), (9.457, 0.027, -36, 0.026), (9.864, 0.048, -43, 0.014)]
    t = np.arange(0, N + 64, 64) / SR
    s, hold, db, swell = np.transpose(squeezes)[:, :, None]
    before = np.maximum((s - t) / np.maximum(swell, .01), 0)
    after = np.maximum(t - s - hold, 0) / RELEASE_S
    power = np.sum(undb(db - 20 * (before + after)) ** 2, axis=0) + undb(REST_DB) ** 2
    return np.interp(np.arange(N) / SR, t, 10 * np.log10(power))


def creases(lo_hz, hi_hz, cycles, spread_db, count):
    """Random pulse train: ring pitch is even over octaves, many creases are weak and few strong."""
    u = rng.random((count, 4)).T
    hz = lo_hz * (hi_hz / lo_hz) ** u[1]
    size = undb(-spread_db * np.log(u[2] + 0.042)) * np.sign(u[3] - .5)
    return rings(u[0] * N / SR, hz, cycles, size)


def pouch(x):
    """Modal resonance: the padded air pocket responds in a few broad, parallel modes."""
    # modes of air and padding: f/Hz, bandwidth/Hz, level/dB
    pouch_modes = [(339, 18.4, -15), (467, 39, -6), (823, 216, 2.5), (1005, 100, -0.5)]
    out = np.zeros(len(x))
    for hz, width, db in pouch_modes:
        b, a = signal.iirpeak(hz, hz / width, SR)
        out += undb(db) * signal.lfilter(b, a, x)
    return out


def walk(rate):
    """Smoothed sample-and-hold: normal random levels, drawn rate times a second, slew into each other."""
    k = int(SR / rate)
    held = np.repeat(rng.standard_normal(N // k + 1), k)
    return uniform_filter1d(held, k // 2 + 1)[:N]


def knock():
    """Modal impact: one hollow blow on the desk excites a few damped modes together."""
    # modes of the blow: f/Hz, level/dB, t60/s
    knock_modes = [(329, 1.5, 0.051), (618, 0.5, 0.032), (450, -10, 0.045)]
    hz, db, t60 = np.transpose(knock_modes)
    return rings(KNOCK_S + 0 * hz, hz, t60 * hz, undb(KNOCK_DB + db))


def room(x):
    """Diffuse reverberation: desk and walls add a dense, exponentially decaying tail, a little dull."""
    t = np.arange(SR // 2) / SR
    tail = band(rng.standard_normal(len(t)), 170, 2500)
    tail = tail * undb(-60 * t / ROOM_T60_S) * (t > .004)
    tail = tail / np.sqrt(np.sum(tail ** 2))
    return x + undb(ROOM_DB) * signal.fftconvolve(x, tail)[:N]


def band(x, lo_hz, hi_hz):
    """Band limitation: a Butterworth band-pass, flat between its corners."""
    return signal.sosfilt(signal.butter(2, [lo_hz, hi_hz], "band", fs=SR, output="sos"), x)


def hiss():
    """Stationary noise: room and microphone noise is white noise shaped by a smooth spectrum."""
    # spectrum of the hiss: f/Hz, relative level per Hz/dB
    hiss_spectrum = [(20, -4), (120, -4), (330, 0), (1000, 1), (1500, -5), (6000, -8), (10000, -12)]
    hz, db = np.transpose(hiss_spectrum)
    f = np.fft.rfftfreq(N, 1 / SR) + 1  # 1 Hz up, to keep the logarithm finite
    gain = undb(np.interp(np.log(f), np.log(hz), db))
    return level(irfft(rfft(rng.standard_normal(N)) * gain, N), HISS_DB)


def scene():
    """Linear superposition: snaps, rustle and knock sound in the room, over the hiss."""
    mailer = loud_snaps() + rustle() + knock()
    return (room(mailer) + hiss())[None]


def record(dry):
    """Transducer limits: the small microphone loses bass, loud peaks saturate and the top is cut."""
    thin = signal.sosfilt(signal.butter(4, 235, "high", fs=SR, output="sos"), dry)
    thin = thin + undb(-24.5) * band(dry, 61, 170)  # a little bass leaks through the housing
    thin = thin + level(band(rng.standard_normal(N), 15, 140), CIRCUIT_DB)
    rounded = 0.9 * np.tanh(thin / 0.9)
    return signal.sosfilt(signal.ellip(10, .2, 60, TOP_HZ, fs=SR, output="sos"), rounded)


dry = scene()
out = record(dry)
pcm_store(out)
```